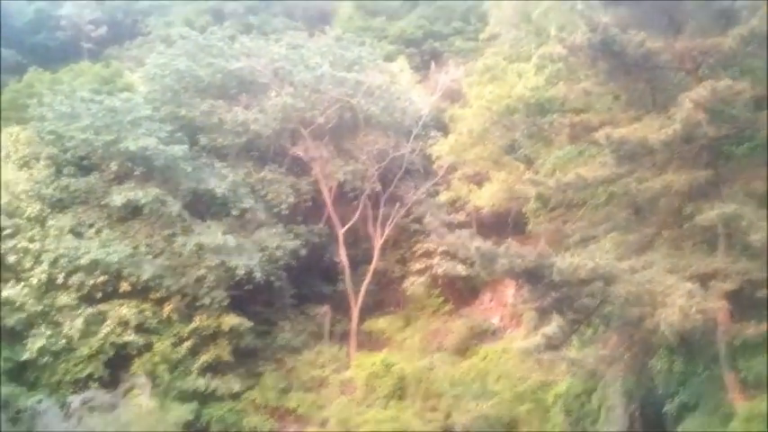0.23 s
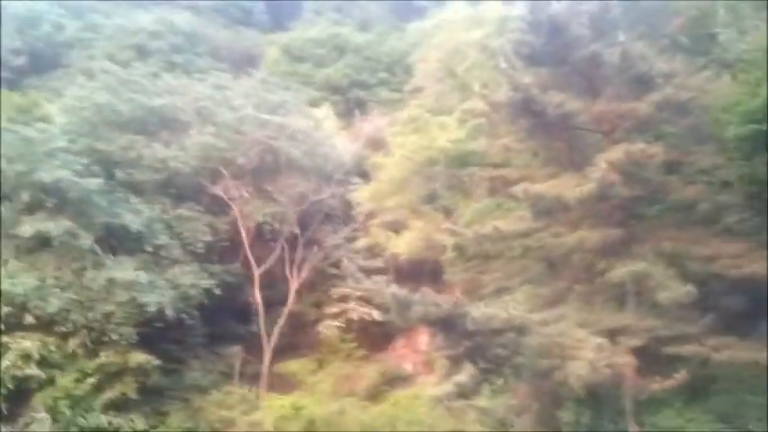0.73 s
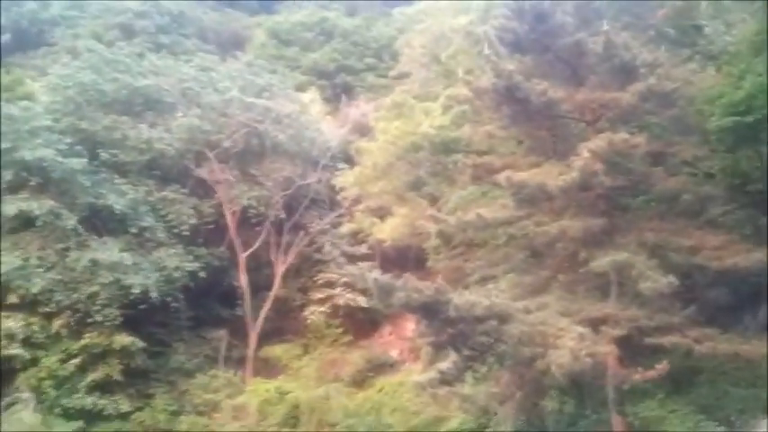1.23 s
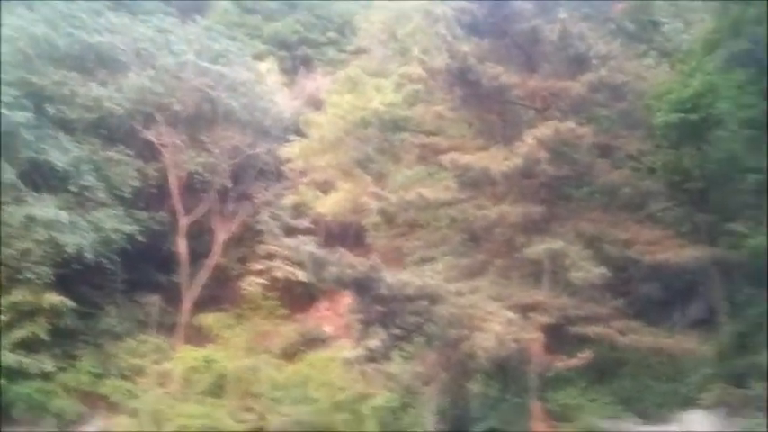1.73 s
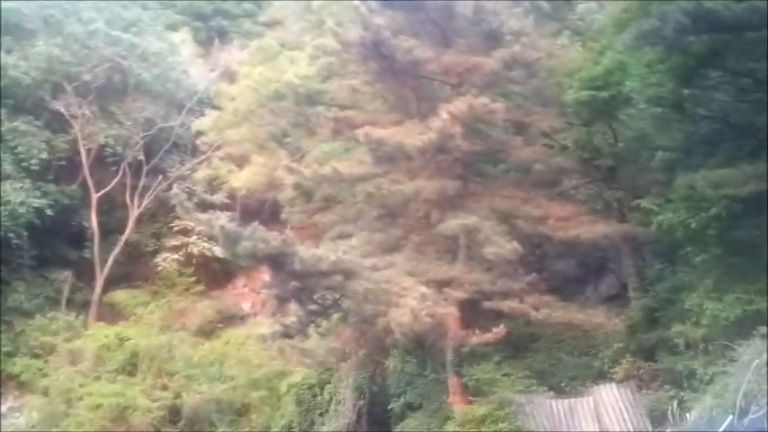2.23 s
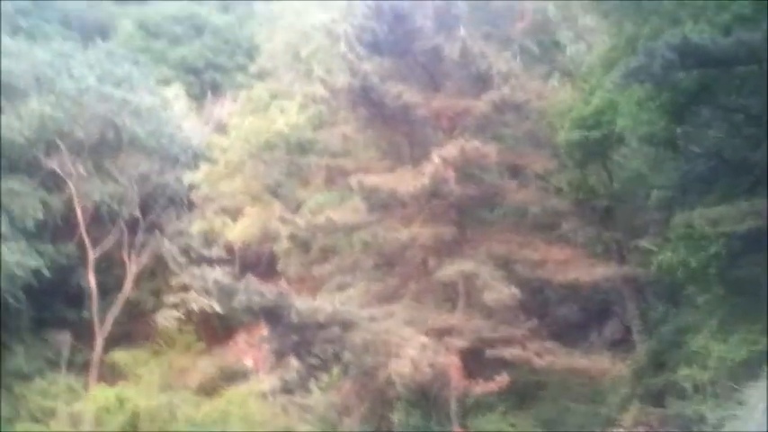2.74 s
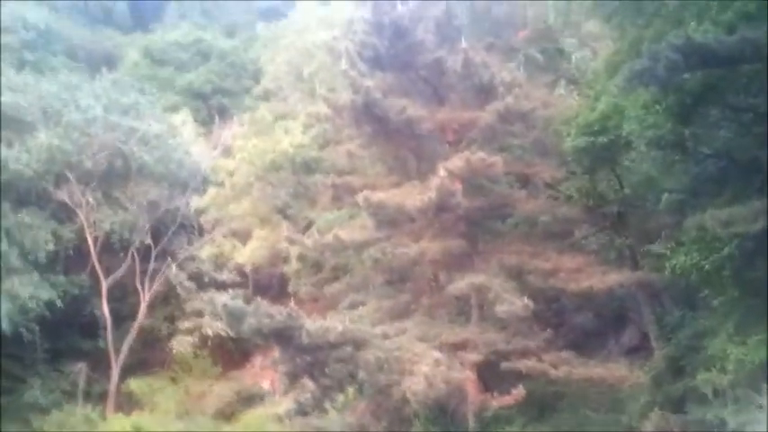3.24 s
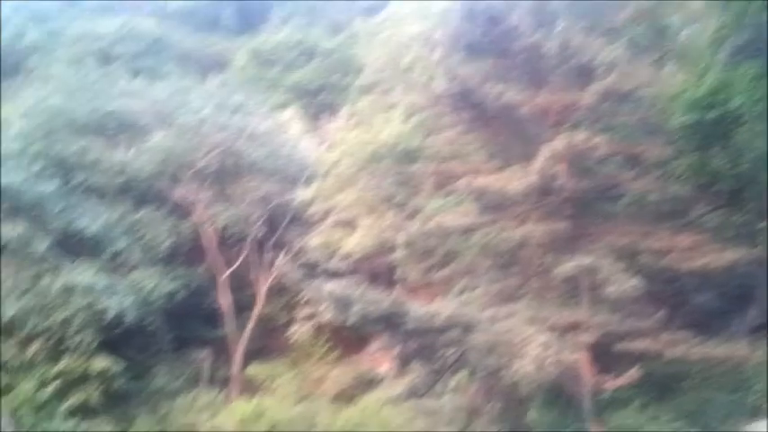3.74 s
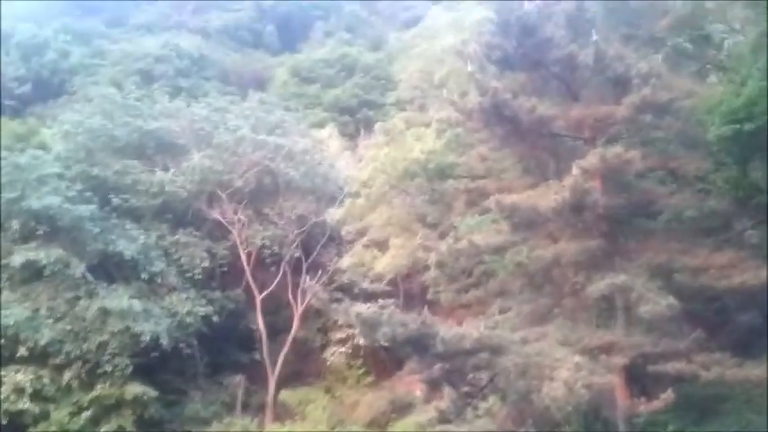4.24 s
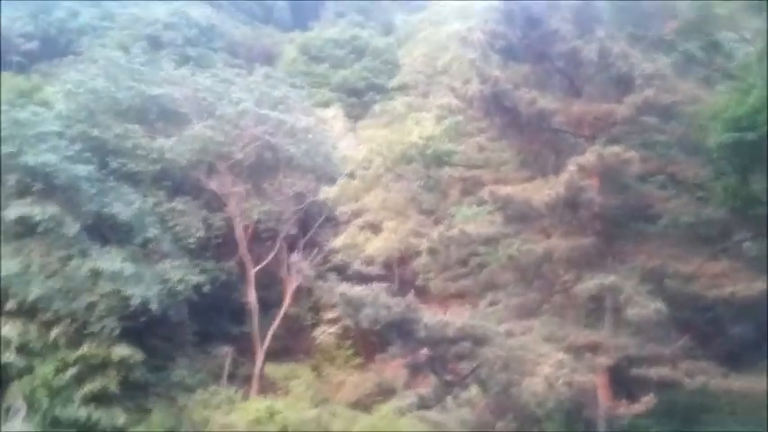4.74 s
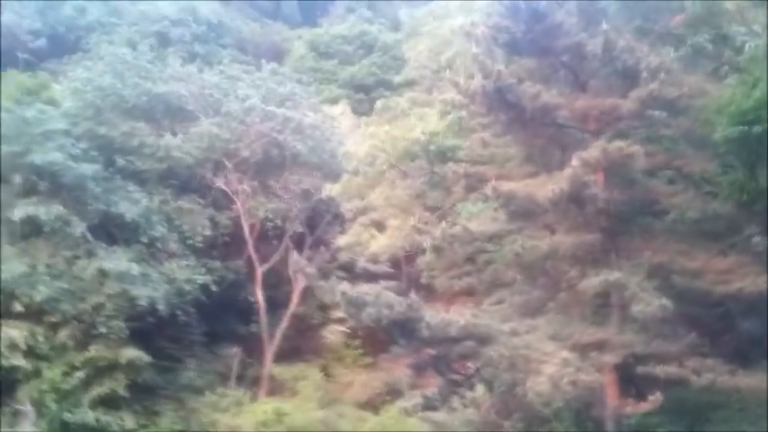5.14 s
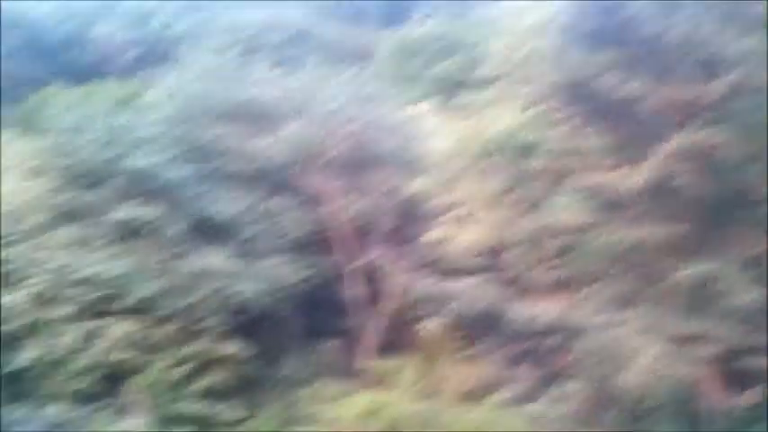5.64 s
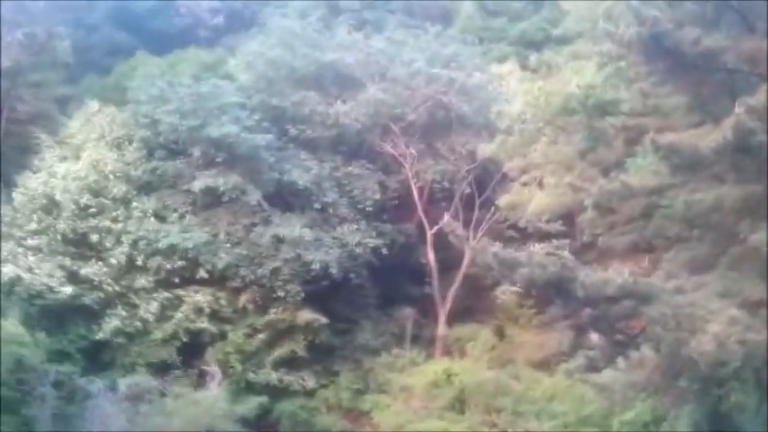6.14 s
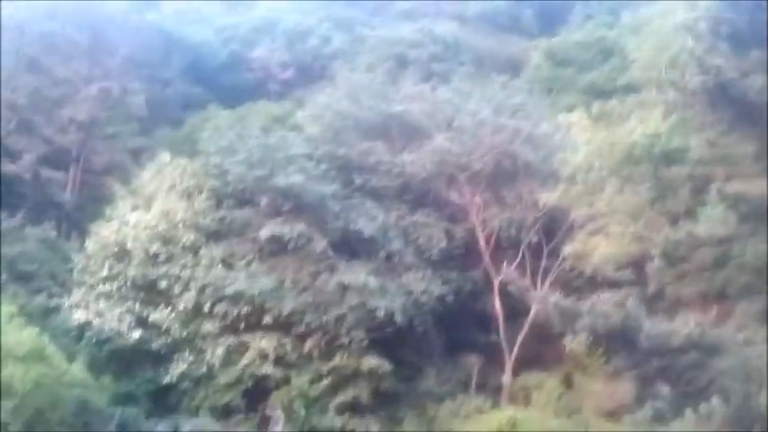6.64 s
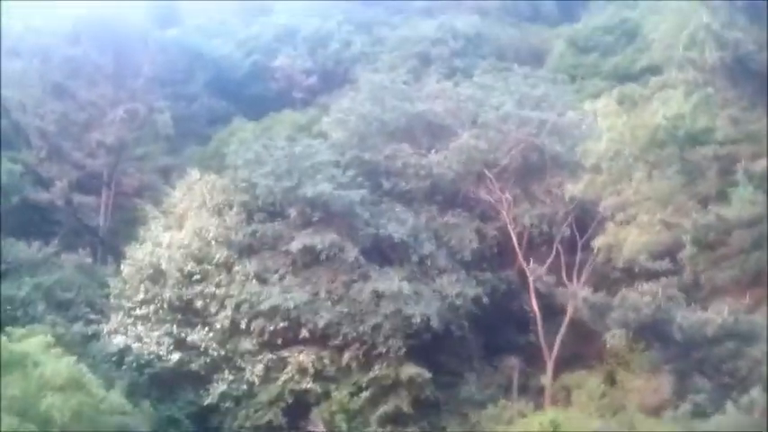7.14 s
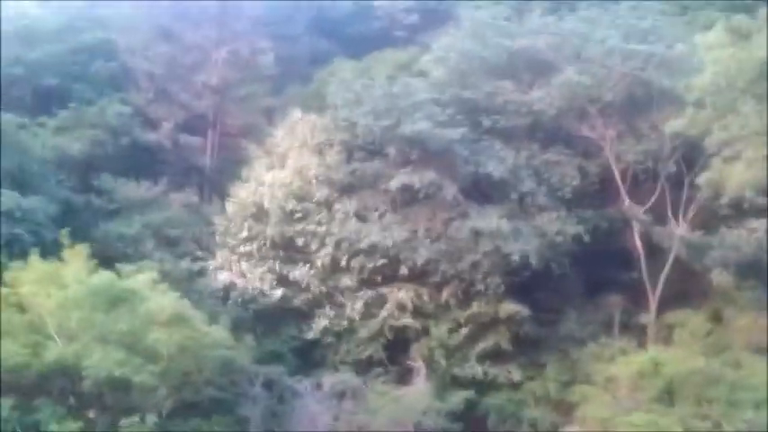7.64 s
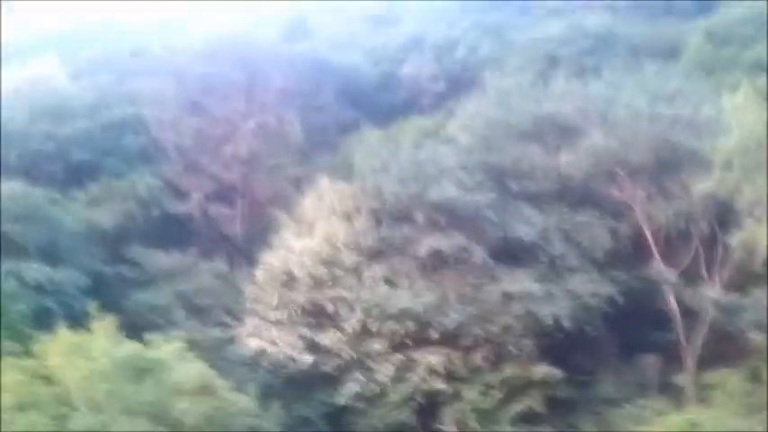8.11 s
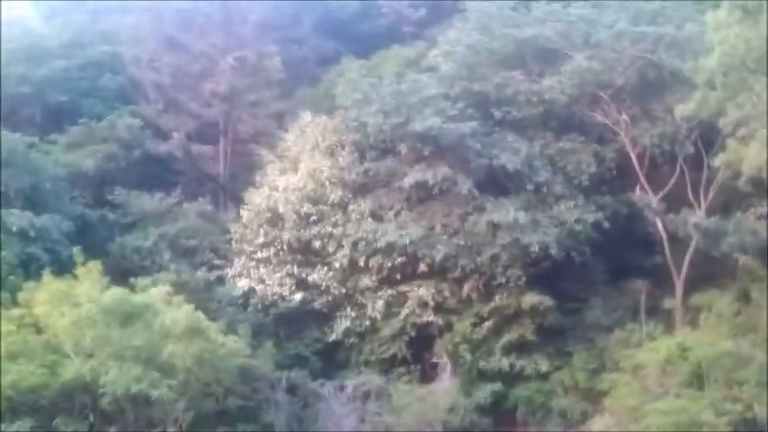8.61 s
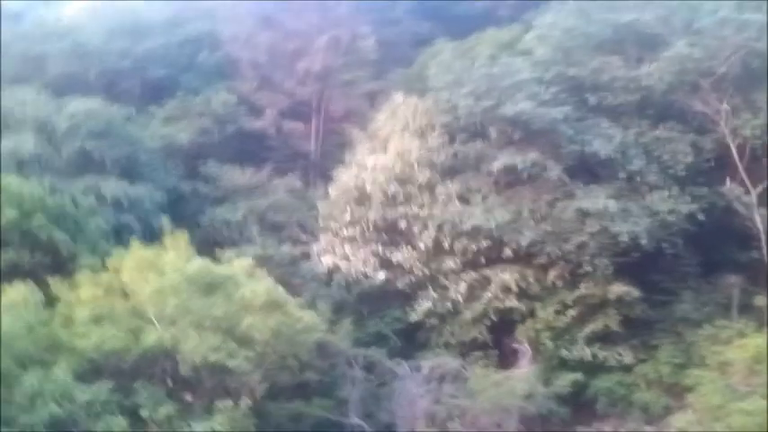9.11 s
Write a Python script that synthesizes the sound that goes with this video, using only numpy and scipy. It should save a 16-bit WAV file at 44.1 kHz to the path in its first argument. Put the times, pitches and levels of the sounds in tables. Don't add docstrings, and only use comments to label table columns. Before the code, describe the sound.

Birdsong fills a reverberant wood: rapid high notes and buzzes first, then a clear arched whistle, sharp chirps and downward swoops, a sparser middle, a jumbled run, three strong warbles that grow softer, and finally a thin blurred trill. Faint flocks twitter far away. Quiet valley rush continues throughout, and a few dry snaps sound close to the handheld phone microphone.

```python
import sys
import numpy as np
from scipy import signal
from scipy.fft import rfft, irfft
from scipy.io import wavfile
from scipy.ndimage import uniform_filter1d

SR = 44100
rng = np.random.default_rng(int(sys.argv[2]) if len(sys.argv) > 2 else 0)


def pcm_store(signal):
    levels = np.round(np.clip(np.atleast_2d(signal), -1, 1) * 32767)
    wavfile.write(sys.argv[1], SR, levels.astype(np.int16).T)


def attenuation_scalar(level_db):
    decades = np.asarray(level_db, float) / 20
    return 10 ** decades


N = 413216
TIME = np.arange(N) / SR

# start in seconds, end in seconds, level in dB, centre pitch in Hz.
BREATHS = [
    (8.59, 8.745, -42, 4780),
    (8.785, 8.996, -42.5, 4900),
    (9.025, 9.161, -43.5, 4975),
    (9.196, 9.4, -43.1, 5010),
]
TRILL_EDGE_S = .011


def colour(x, points):
    hz, db = np.transpose(points)
    grid = np.log(np.fft.rfftfreq(N, 1 / SR) + 1)
    return irfft(rfft(x) * attenuation_scalar(np.interp(grid, np.log(hz), db)), N)


def rms_one(x):
    return x / np.sqrt(np.mean(x ** 2) + 1e-20)


def band(x, low_hz, high_hz):
    return signal.sosfilt(signal.butter(2, [low_hz, high_hz], "band", fs=SR, output="sos"), x)


def flutter(low_hz, high_hz):
    return rms_one(band(rng.standard_normal(N), low_hz, high_hz))


def wood(x, direct_db, near_db, t60):
    sway = .5
    t = TIME[:SR]
    near, far = rng.standard_normal((2, SR)) * attenuation_scalar(-60 * t / np.array([[.05], [t60]]))
    far = far * (1 - np.exp(-t / 0.0049))
    path = attenuation_scalar(near_db) * near / np.linalg.norm(near) + far / np.linalg.norm(far)
    path[0] += attenuation_scalar(direct_db)
    spectrum = rfft(path)
    power = abs(spectrum) ** 2
    even = spectrum * np.sqrt(power.mean() / uniform_filter1d(power, size=250))
    path = irfft(even, SR)[:SR * 9 // 10]
    shaken = x * (1 + sway * flutter(12, 90)) / np.hypot(1, sway)
    return path[0] * (x - shaken) + signal.fftconvolve(shaken, path)[:N]


def glides(rows, early=.68, lift_hz=0, at_s=0, gain_db=0):
    return [(at_s + s, length, a, a + early * (b - a) + lift_hz, b, db + gain_db)
            for s, length, a, b, db in rows]


def whistles(notes, edge_s, hoarse, fade_db=0):
    out = np.zeros(N + SR)
    for s, length, start_hz, middle_hz, end_hz, db in notes:
        u = np.linspace(0, 1, max(int(length * SR), 64))
        hz = start_hz * (1 - u) * (1 - 2 * u) + 4 * middle_hz * u * (1 - u) + end_hz * u * (2 * u - 1)
        from_edge = np.minimum(u, 1 - u) * length
        shape = np.sin(np.pi / 2 * np.clip(from_edge / edge_s, 0, 1)) ** 2
        level_db = db + fade_db * (.4 - u) * (end_hz < start_hz)
        tone = np.sin(2 * np.pi * np.cumsum(hz) / SR)
        at = int(max(s, 0) * SR)
        out[at:at + len(u)] += np.sqrt(2) * attenuation_scalar(level_db) * shape * tone
    return out[:N] * (1 + hoarse * flutter(40, 280))


def air():
    # frequency in Hz, density in dB per Hz.
    rush_curve = [(18, -40), (30, -22), (64, -0.5), (96, -0.5), (446, -2.5), (548, -5), (2210, -14.5),
                  (4820, -12), (5920, -11.5), (7110, -22.5), (9240, -47.5), (15600, -120)]
    rush = rms_one(colour(rng.standard_normal(N), rush_curve))
    stir = attenuation_scalar(1.3 * flutter(0.94, 5)) - 1
    rush = rush + stir * band(rush, 2800, 7900)
    drone = flutter(425, 465) * np.interp(TIME, [6.2, 7.2], [1, .3])
    return attenuation_scalar(-57.5) * rush + attenuation_scalar(-71.5) * drone


def haze():
    # start in seconds, length in seconds, start pitch in Hz, end pitch in Hz, level in dB.
    distant_whistles = [(3.16, .12, 4170, 4160, -56.5), (3.92, 0.075, 5900, 5800, -65),
                        (4.21, .09, 5450, 6300, -62), (5.17, .19, 4050, 3980, -69),
                        (6.58, .14, 4150, 4250, -63), (8.37, .24, 4130, 4300, -61),
                        (7.9, 0.3, 4400, 4250, -64), (8.3, .14, 3880, 4080, -65),
                        (7.78, .09, 4600, 4600, -67), (6.3, .22, 4150, 4700, -58),
                        (8.1, .1, 4200, 3900, -66)]
    sung = whistles(glides(distant_whistles), edge_s=.04, hoarse=.6)
    return wood(sung, direct_db=-4, near_db=1, t60=0.42)


def chatter(per_s=260):
    # start in seconds, length in seconds, start pitch in Hz, end pitch in Hz, level in dB.
    loose_flocks = [(1.9, .34, 4400, 5300, -55), (2.9, .32, 5900, 3800, -63), (4.26, .22, 5000, 4800, -58),
                    (.6, .11, 4000, 4700, -59.5), (4.1, .25, 4700, 4400, -60.5),
                    (6.0, .3, 5000, 5300, -59.5), (6.329, .26, 5200, 5700, -54), (8.3, .2, 4200, 3400, -64),
                    (7.902, .59, 5800, 5000, -67), (8.6, .15, 4600, 4500, -59),
                    (4.92, .18, 3900, 3700, -61), (1.96, .28, 4500, 7300, -63.5)]
    tight_flocks = [(6.3, .26, 4200, 4750, -56), (6.15, .08, 5650, 5750, -52), (6.47, .13, 6100, 6200, -56),
                    (6.5, .1, 6900, 6900, -66), (7.79, .39, 4350, 4250, -59), (5.9, 0.49, 4300, 3900, -61),
                    (.24, .09, 4100, 4000, -65), (2.03, .15, 6000, 6150, -60)]
    loose_spread_hz, tight_spread_hz = 730, 290
    flocks = [(*row, loose_spread_hz) for row in loose_flocks]
    flocks += [(*row, tight_spread_hz) for row in tight_flocks]
    notes = []
    for s, length, start_hz, end_hz, db, spread_hz in flocks:
        when, slide, loud = rng.random((150, 3))[:int(per_s * length)].T
        scatter_hz = spread_hz * rng.uniform(-1.07, 1, 150)[:len(when)]
        hz = start_hz + (end_hz - start_hz) * when + scatter_hz
        swell_db = db - 6.2 * (2 * when - 1) ** 2 - 5.8 * loud
        lengths = np.full(len(when), 0.011)
        notes += zip(s + when * length, lengths, hz + 490 * slide, hz, hz - 1460 * slide, swell_db)
    return wood(whistles(notes, edge_s=0.0046, hoarse=0.67), direct_db=-4, near_db=-3, t60=0.4)


def far_birds():
    # start in seconds, length in seconds, start pitch in Hz, level in dB.
    far_pipes = [(.003, 0.041, 5960, -54), (.455, 0.07, 1958, -59.5), (.535, .06, 2440, -61.5),
                 (5.385, 0.056, 1945, -65), (5.465, 0.047, 2410, -71), (5.568, 0.037, 5940, -58.5),
                 (5.985, 0.023, 5850, -55), (6.254, 0.024, 4240, -58.5), (6.425, 0.034, 5780, -48.5),
                 (9.282, .026, 3950, -65), (9.075, .026, 4000, -64), (9.098, .045, 3800, -67)]
    far_rises = [(.232, 0.027, 3520, -62), (.598, 0.072, 3970, -58), (3.24, .022, 4860, -66),
                 (3.275, .014, 4840, -54), (3.296, 0.02, 4840, -57), (3.315, .014, 4500, -57),
                 (4.07, 0.018, 4800, -55), (7.829, .033, 3890, -57), (9.15, 0.075, 3000, -71.5),
                 (7.8, .035, 3800, -63)]
    far_falls = [(.399, 0.017, 3240, -57), (2.275, .017, 5700, -52), (2.344, 0.013, 3400, -57),
                 (3.984, 0.017, 2710, -62), (5.675, 0.087, 5000, -68), (9.205, .018, 3600, -64),
                 (9.345, .022, 3600, -66), (9.225, .045, 5850, -57), (4.1, .02, 5800, -58)]
    kinds = [(far_pipes, 1.01), (far_rises, 1.22), (far_falls, .86)]
    rows = [(s, length, hz, hz * ratio, db - 1.9) for calls, ratio in kinds for s, length, hz, db in calls]
    return wood(whistles(glides(rows, early=.5), edge_s=.012, hoarse=.2), direct_db=5.5, near_db=0.5, t60=0.3)


def scolds(pulse_hz=140, length_s=0.038):
    # start in seconds, peak level in dB.
    outbursts = [(7.3624, -48), (7.432, -44), (7.6168, -46), (7.675, -48.5), (7.857, -46.5), (7.917, -45.5),
                 (8.094, -47.5), (8.164, -44)]
    half_s = length_s / 2
    gate = sum(attenuation_scalar(db - 13) * np.exp(-((TIME - s - half_s) / half_s) ** 4) for s, db in outbursts)
    rasp = rng.standard_normal(N) * (1 + np.cos(2 * np.pi * pulse_hz * TIME))
    throat = band(band(rasp, 1450, 2600), 1200, 3200)
    return wood(gate * rms_one(throat), direct_db=1.1, near_db=-2.7, t60=0.64)


def trill_breaths():
    rest_db, onset_hz, settle_s, tire_db_per_s = -56, 259, .04, 10.5
    level_db, centre_hz = np.full(N, rest_db), np.zeros(N)
    for start, end, db, hz in BREATHS:
        age = TIME - start
        on = np.clip(np.minimum(age, end - TIME) / TRILL_EDGE_S + 1, 0, 1)
        level_db = level_db + on * (db + 1 - tire_db_per_s * age - level_db)
        settling_hz = hz + onset_hz * np.exp(-np.maximum(age, 0) / settle_s)
        centre_hz = np.where(age > -TRILL_EDGE_S, settling_hz, centre_hz)
    return level_db, centre_hz


def trill(per_s=100, sweep_hz=331, uneven=.25):
    level_db, centre_hz = trill_breaths()
    wobble, effort, waver = [flutter(15, 70) for k in range(3)]
    stroke = np.cumsum(per_s * (1 + uneven * wobble)) / SR % 1
    hz = centre_hz + 103 * waver + sweep_hz * (1 - 2 * stroke)
    tone = np.sin(2 * np.pi * np.cumsum(hz) / SR)
    sung = attenuation_scalar(level_db + 1.7 * effort - 3) * (centre_hz > 0) * np.sin(np.pi * stroke) * tone
    openings = [(s - .018, .022, hz + 120, hz + 330, db - 7.5) for s, end, db, hz in BREATHS]
    sung = sung + whistles(glides(openings, early=.9), edge_s=0.0063, hoarse=.2)
    return wood(sung, direct_db=2.2, near_db=1.5, t60=0.53)


def arch():
    # time in seconds, pitch in Hz, level in dB.
    arch_points = [
        (2.46, 2740, -66),
        (2.555, 2784, -49),
        (2.59, 2960, -47),
        (2.634, 3304, -40),
        (2.69, 3610, -41.5),
        (2.72, 3480, -37.5),
        (2.765, 3103, -40),
        (2.785, 2850, -61),
    ]
    s, hz, level_db = np.transpose(arch_points)
    hz, level_db = np.interp(TIME, s, hz), np.interp(TIME, s, level_db)
    sounding = (TIME > s[0]) & (TIME < s[-1])
    tone = np.sin(2 * np.pi * np.cumsum(uniform_filter1d(hz, size=900)) / SR)
    return wood(attenuation_scalar(level_db - 5) * sounding * tone, direct_db=5.9, near_db=-1.5, t60=0.67)


def whistlers():
    # start in seconds, length in seconds, start and end pitch in Hz, level in dB.
    loose_whistles = [(3.032, .038, 6170, 6130, -57), (8.94, .055, 5330, 5570, -54),
                      (9.26, .045, 5650, 6100, -59), (8.612, .035, 4330, 4330, -56),
                      (8.57, .026, 5150, 5350, -49), (8.592, .07, 5340, 5250, -54),
                      (3.086, .021, 2860, 2710, -54), (3.09, 0.03, 5460, 5950, -54),
                      (3.142, .036, 5100, 5700, -57), (3.983, .022, 4300, 3930, -50),
                      (3.995, 0.055, 3920, 3850, -45.5), (4.057, .055, 4030, 3950, -48),
                      (4.132, 0.058, 3900, 4050, -51), (4.795, 0.055, 3440, 4400, -44),
                      (4.81, .044, 3020, 4290, -52), (4.839, 0.063, 4430, 4356, -49),
                      (5.24, 0.12, 7700, 6360, -67), (3.115, 0.13, 2037, 1520, -66),
                      (8.485, .12, 2100, 1520, -64.5)]
    jumble = [(5.748, 0.04, 4950, 5750, -60), (5.805, .025, 5500, 5500, -59),
              (5.785, 0.035, 4900, 4750, -55), (5.812, .03, 4750, 4600, -50),
              (5.837, 0.038, 4680, 6550, -52.5), (5.872, 0.028, 6650, 6400, -54),
              (5.892, .03, 6450, 6080, -48), (5.994, 0.028, 4200, 5000, -47),
              (6.016, 0.04, 4850, 3750, -51), (6.051, 0.03, 5550, 5000, -58), (6.07, .016, 4950, 5200, -55),
              (6.107, 0.02, 6600, 5800, -55), (6.122, .038, 5880, 5500, -51),
              (6.154, 0.025, 5500, 4050, -48), (6.452, .026, 5750, 6350, -51),
              (6.217, .024, 7300, 6250, -62), (6.251, .028, 7300, 6200, -63),
              (2.347, .036, 4420, 4150, -53), (2.376, .025, 4150, 3600, -52),
              (2.394, 0.03, 3620, 3750, -51), (2.418, .017, 3700, 4120, -46), (2.43, .05, 4080, 3700, -43),
              (2.565, .025, 5300, 5850, -62), (2.643, .02, 5050, 5350, -61), (1.85, .045, 4350, 3800, -57),
              (1.888, .045, 3850, 2900, -58), (1.892, .045, 4650, 4750, -58), (2.445, .02, 3600, 3100, -56),
              (1.955, .048, 4050, 4800, -53), (2.23, .035, 5300, 5800, -53), (.395, .045, 7600, 5500, -64)]
    wide_arches = [
        (7.91, .08, 4700, 4250, -55),
        (8.245, .078, 4250, 4100, -56.5),
    ]
    slurs = [
        (2.891, .026, 3450, 2850, -45),
        (2.917, .026, 3820, 3150, -43),
        (3.111, .025, 3820, 3050, -43),
    ]
    # start in seconds, level in dB.
    swoops = [
        (3.417, -46.5),
        (3.609, -44),
    ]
    swoop_parts = [
        (0, .018, 5700, 5200, -6),
        (.008, .078, 5250, 4250, -.6),
    ]
    # start in seconds, length in seconds, start pitch in Hz, level in dB.
    chips = [(3.499, 0.013, 4180, -52), (3.692, 0.011, 4120, -51), (3.705, .011, 4070, -52),
             (3.72, .011, 4070, -55), (3.768, 0.011, 4040, -53), (3.886, 0.01, 3950, -54),
             (4.049, .011, 4100, -48), (4.09, .012, 3950, -51), (4.118, .01, 3950, -57),
             (4.156, .012, 4000, -51), (4.298, .011, 4000, -57)]
    # start in seconds, level in dB, lead-in level in dB.
    chirps = [
        (2.476, -44, -62),
        (2.796, -43.5, -52.5),
        (3.094, -43.5, -55),
    ]
    # start re chirp in seconds, length in seconds, start and end in Hz.
    lead_in = [
        (-.054, 0.052, 4150, 4280),
        (-.043, 0.048, 3520, 3580),
    ]
    chip_drop_hz = 1350
    notes = glides(loose_whistles) + glides(jumble, early=.5) + glides(wide_arches, lift_hz=800)
    notes += glides(slurs, early=.55)
    for s, db in swoops:
        notes += glides(swoop_parts, early=.58, at_s=s, gain_db=db)
    notes += glides([(s, length, hz, hz - chip_drop_hz, db) for s, length, hz, db in chips], early=0.36)
    for s, db, lead_db in chirps:
        notes += glides([(s, .028, 4050, 4350, db)], lift_hz=600)
        notes += glides([(*row, lead_db) for row in lead_in], at_s=s)
    return notes


def warble(s, length, db, period_s, rise_s, from_hz, top_hz, low_hz, fall_db, first_db, fade_db, step_hz, early):
    notes, vary = [], 1 + 0.016 * rng.standard_normal((8, 3))
    for k, at in enumerate(np.arange(s, s + length, period_s)[:8]):
        level_db = db - fade_db * k + first_db * (k == 0)
        a, top, low = vary[k] * [from_hz, top_hz, low_hz]
        rise = (at, rise_s + 0.0039, a, top, level_db)
        fall = (at + rise_s - .004, period_s - rise_s + .006, top - step_hz, low, level_db + fall_db)
        notes += glides([rise], early=0.72) + glides([fall], early=early)
    return notes


def warbler():
    # start in seconds, level in dB, low answer level in dB.
    phrases = [
        (6.729, -32.5, -43),
        (7.072, -34.3, -45),
        (7.43, -37, -52),
    ]
    # start in seconds, length in seconds, start and end pitch in Hz, level in dB.
    links = [(6.745, .03, 3900, 3100, -56), (6.722, .03, 4250, 4150, -53), (7.11, 0.026, 6300, 6700, -60),
             (7.35, .03, 4000, 4300, -60), (7.365, .04, 3100, 3180, -56), (7.406, .023, 4470, 4800, -39.5),
             (7.565, .015, 7500, 6200, -64), (7.596, 0.023, 7300, 5800, -61),
             (6.865, .045, 2850, 3300, -61), (7.17, .07, 2850, 3300, -60), (7.507, .03, 3080, 3200, -53),
             (7.085, .03, 4500, 3800, -47)]
    # start in the phrase and length in seconds, start and end in Hz, dB re answer level.
    answer = [
        (.179, .03, 3500, 2550, -0.1),
        (.214, .03, 3720, 2700, 0.1),
        (.25, .028, 3550, 2850, -2),
    ]
    turn = dict(period_s=.032, rise_s=.012, from_hz=4450, top_hz=5550, low_hz=3900, fall_db=-9.5,
                first_db=-7, fade_db=-.3, step_hz=150, early=.72)
    crest = (.102, .024, 5450, 5700, -2.5)
    notes = glides(links, early=.55)
    for k, (s, db, answer_db) in enumerate(phrases):
        sag_hz, lag_s = 90 * k, .006 * k
        held = (.119, .042, 4850 - sag_hz, 4620 - sag_hz, -3.5)
        notes += warble(s, .12, db, **turn)[:-1]
        notes += glides([crest, held], early=.45, at_s=s, gain_db=db)
        notes += glides(answer, early=0.415, at_s=s + lag_s, gain_db=answer_db)
    return notes


def first_singer():
    # start in seconds, lisp level in dB.
    lines_sung = [
        (.364, -64.5),
        (.812, -60.5),
        (1.256, -62),
        (1.704, -61),
    ]
    # start in seconds, gain in dB.
    verses = [
        (.812, -0.1),
        (1.252, -1.2),
    ]
    # start in the line and length in seconds, start and end in Hz, dB.
    verse = [
        (.062, .025, 5240, 5490, -46),
        (.098, 0.044, 5383, 5368, -36),
        (.127, .027, 7400, 6030, -40),
        (.157, 0.04, 4500, 4600, -37.5),
        (.176, .032, 4176, 3440, -39),
        (.2, .034, 3450, 3340, -43),
        (.26, .022, 4147, 4910, -44.5),
    ]
    verse_turn = [
        (.233, 0.0276, 3714, 3423, -36),
    ]
    # start and length in seconds, start and end pitch in Hz, dB.
    graces = [(.432, 0.048, 5300, 5920, -50.5), (.473, .018, 5820, 5300, -56),
              (.923, .015, 5320, 6480, -39), (1.451, 0.035, 5320, 5670, -45),
              (1.495, 0.014, 5950, 6150, -40), (1.578, 0.024, 4740, 4510, -43.5),
              (1.749, .024, 5450, 5000, -45), (1.766, .04, 5050, 4200, -45), (1.8, 0.056, 4150, 4330, -53),
              (1.232, .03, 5200, 4550, -40), (1.315, .025, 5350, 5500, -46), (1.17, .012, 5900, 6350, -42),
              (1.765, .04, 5300, 5800, -50), (1.69, 0.035, 3900, 3230, -61.5)]
    # start in seconds, length in seconds, level in dB.
    buzzes = [
        (1.138, .1, -29.5),
        (1.583, .08, -36),
    ]
    turn = dict(period_s=.0295, rise_s=.013, from_hz=5650, top_hz=5850, low_hz=4930, fall_db=0.1,
                first_db=-3, fade_db=1.7, step_hz=400, early=.78)
    notes = glides(graces)
    for s, db in lines_sung:
        notes += glides([(s + gap_s, .034, 7550, 5700, db) for gap_s in (0, .033)], early=.45)
    for s, db in verses:
        notes += glides(verse, at_s=s, gain_db=db)
        notes += glides(verse_turn, lift_hz=499, at_s=s, gain_db=db)
    for row in buzzes:
        notes += warble(*row, **turn)
    return notes


def singers():
    edge_s, hoarse = .005, .3
    first = wood(whistles(first_singer(), edge_s, hoarse, fade_db=0.1), direct_db=3.1, near_db=0.5, t60=0.55)
    second = wood(whistles(warbler(), edge_s, hoarse, fade_db=8), direct_db=2.2, near_db=2.2, t60=0.55)
    middle = wood(whistles(whistlers(), edge_s, hoarse, fade_db=3), direct_db=2.4, near_db=-0.8, t60=0.64)
    return attenuation_scalar(-4.1) * first + attenuation_scalar(-4.6) * second + attenuation_scalar(-3.9) * middle


def ticks():
    # time in seconds, peak level in dB.
    snaps = [
        (.032, -52),
        (.537, -42),
        (7.468, -31),
        (8.921, -46),
    ]
    clicks = np.zeros(N)
    clicks[[int(s * SR) for s, db in snaps]] = [attenuation_scalar(db + 19) for s, db in snaps]
    age = np.maximum(TIME - 4.796, 0)
    bump = attenuation_scalar(-44) * np.sin(2 * np.pi * 116 * age) * np.exp(-age / 0.0084)
    return band(band(clicks, 860, 5500), 432, 6800) + bump


def scene():
    birds = singers() + far_birds() + haze() + trill() + chatter() + scolds() + arch()
    return (birds + ticks() + air())[None]


def low_pass(x):
    return signal.sosfilt(signal.butter(12, 15400, fs=SR, output="sos"), x)


def record(dry):
    # frequency in Hz, level in dB.
    image_leak = [(7900, -1), (8600, -9), (9300, -22.5), (9900, -34), (10400, -66.5)]
    first_rate_hz = 16000
    x = signal.sosfilt(signal.cheby2(8, 22, first_rate_hz / 2, fs=SR, output="sos"), dry[0])
    x = signal.sosfilt(signal.butter(6, 8600, fs=SR, output="sos"), x)
    mirror = 2 * band(x, 4500, 9000) * np.cos(2 * np.pi * first_rate_hz * TIME)
    hiss = attenuation_scalar(-93.5) * rng.standard_normal(N)
    return low_pass((x + colour(mirror, image_leak) + hiss)[None])


dry = scene()
out = record(dry)
pcm_store(out)
```